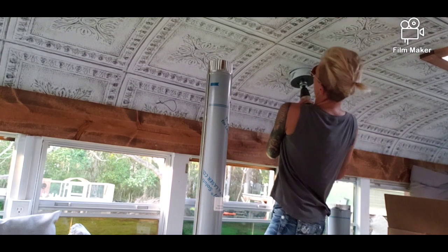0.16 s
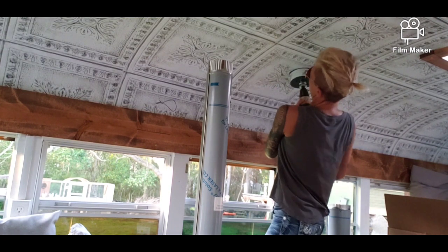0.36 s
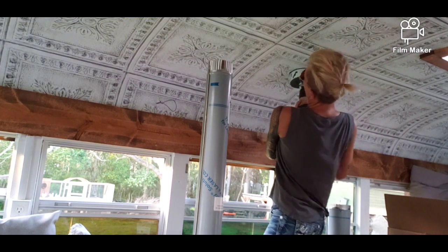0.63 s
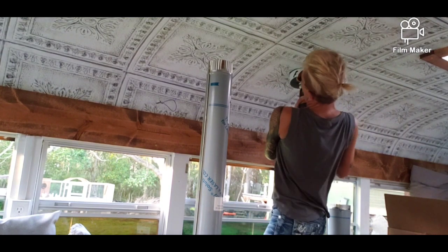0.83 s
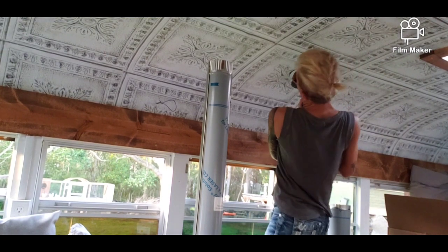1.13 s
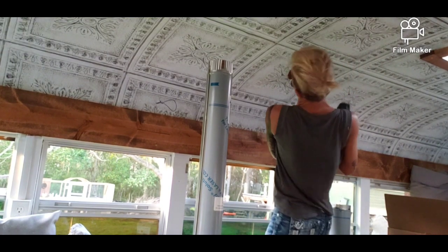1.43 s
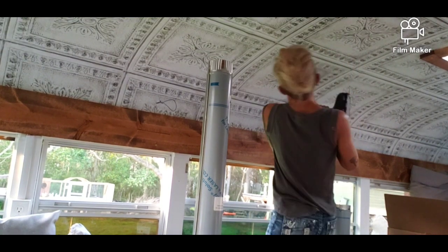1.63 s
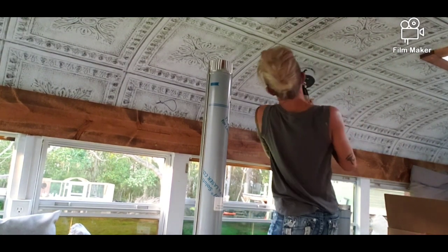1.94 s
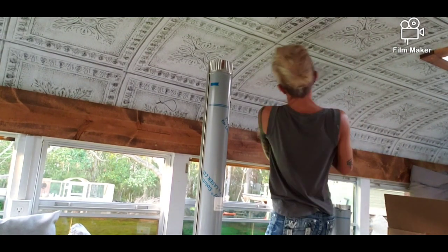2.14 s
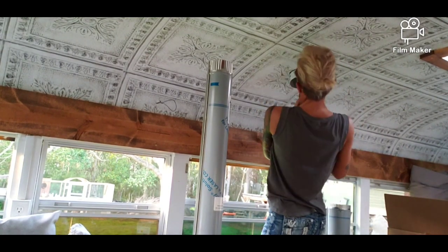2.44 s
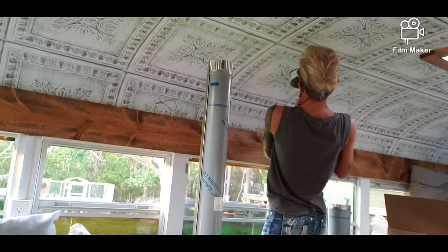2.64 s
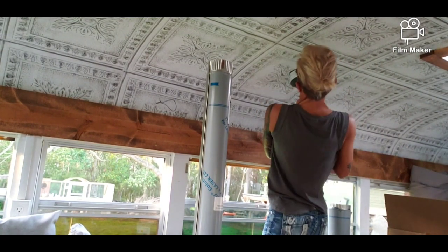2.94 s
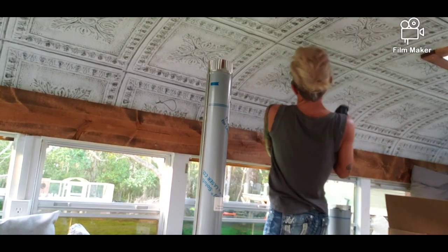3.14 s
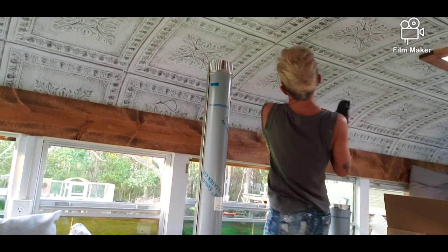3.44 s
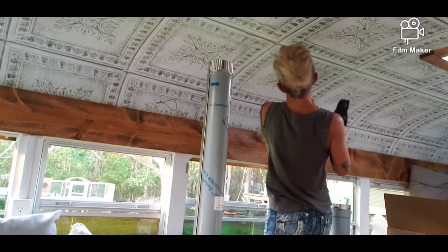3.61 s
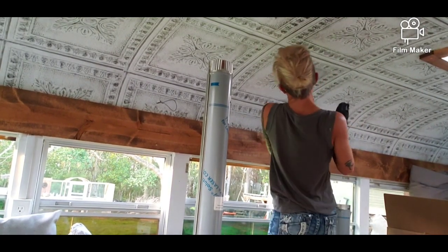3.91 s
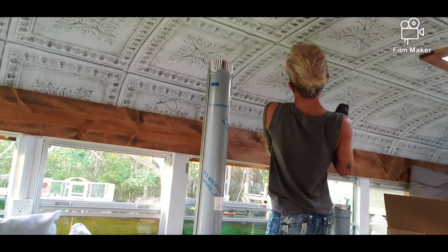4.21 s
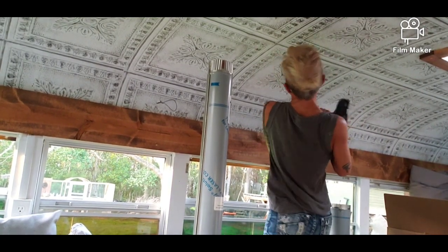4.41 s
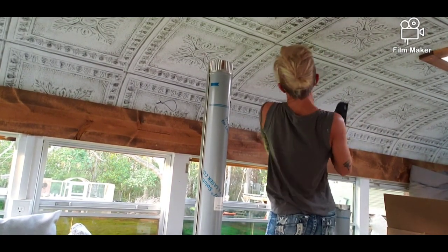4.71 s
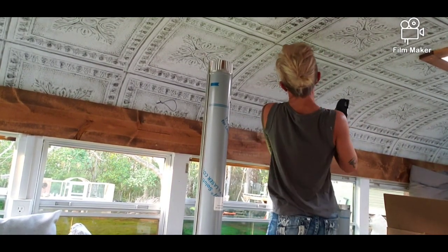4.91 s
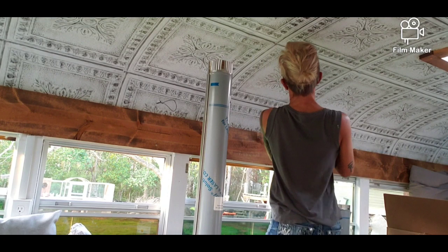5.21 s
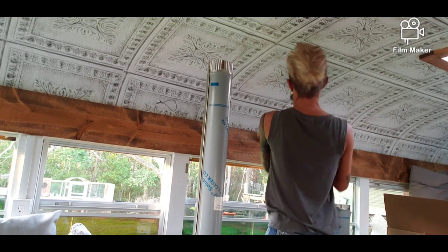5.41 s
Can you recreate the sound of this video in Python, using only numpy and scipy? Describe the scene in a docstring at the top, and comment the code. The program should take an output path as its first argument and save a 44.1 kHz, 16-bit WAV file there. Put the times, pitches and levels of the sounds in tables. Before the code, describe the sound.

Heard from nearby inside a small, hard-walled vehicle, a hole saw grinds into the metal roof in quick, uneven bursts, with hissing chips, low booming and a few thin squeaks. It eases off into a short lull with soft knocks. A second, longer run follows, juddering and snagging as the cordless drill whines underneath, then weakens with a brief falling groan from the metal.

```python
"""A hole saw bites into sheet metal with a gritty rasp, driven up through a vehicle's roof by a cordless drill.
It cuts in two runs with a pause between. Tilted, it grabs and lets go about five times a second:
the teeth tear hissing chips, the sheet rasps, the panel rattles and the roof booms.
Now and then the teeth snag and knock and the rim squeaks.
The drill whines under the cut, all inside a small, hard cabin."""
import sys
import numpy as np
from scipy import signal
from scipy.fft import rfft, irfft
from scipy.io import wavfile
from scipy.ndimage import uniform_filter1d

SR = 44100
rng = np.random.default_rng(int(sys.argv[2]) if len(sys.argv) > 2 else 0)


def wrap_up_sound(samples):
    """Save the sound to the file named by the first command line argument, as 16-bit audio."""
    columns = np.atleast_2d(samples).T
    # keep every value between -1 and 1, then stretch to whole-number steps
    tamed = np.clip(columns, -1, 1)
    steps = np.round(tamed * 32767).astype(np.int16)
    wavfile.write(sys.argv[1], SR, steps)


N = 245146
TIME, FREQS = np.arange(N) / SR, np.fft.rfftfreq(N, 1 / SR)

# Table levels are relative; each layer gets its trim in the mix.
# the tilted saw bites, holds and lets go:
# (start [s], attack [s], hold [s], chip hiss [dB], sheet rasp [dB], panel rattle [dB], roof boom [dB])
BITES = [(0.048, 0.011, .1, -32, -30, -27, -21.5), (.23, 0.062, .12, -26.5, -25, -22.5, -22),
         (0.511, 0.044, 0.15, -29.5, -25, -20, -23), (0.804, 0.017, 0.086, -28.5, -30, -27.5, -32),
         (1.037, 0.047, 0.07, -30.5, -30.5, -32, -26), (1.229, 0.054, 0.033, -31, -31, -29.5, -26.5),
         (1.358, 0.078, .04, -30.5, -28.5, -28, -22.5), (1.857, 0.043, 0.011, -57.5, -44, -41, -33),
         (2.005, 0.025, .01, -71, -57.5, -56, -58), (2.287, 0.022, 0.013, -90, -64.5, -42, -42.5),
         (2.407, 0.026, 0.024, -91, -80, -60, -46), (2.669, 0.028, 0.04, -70, -60, -49, -40.5),
         (2.767, 0.083, 0.15, -32, -32, -36, -32), (2.98, 0.031, 0.075, -36.5, -34, -34, -30),
         (3.071, 0.02, 0.098, -32.5, -28.5, -24.5, -22.5), (3.247, 0.03, .004, -34, -31.5, -26.5, -20),
         (3.391, 0.006, 0.087, -31.5, -28.5, -33, -22), (3.562, 0.043, 0.044, -32, -28, -27.5, -28),
         (3.746, 0.058, 0.054, -31, -26.5, -29, -23.5), (3.916, 0.034, 0.014, -22.5, -22.5, -15.5, -24),
         (4.007, 0.038, 0.087, -35.5, -31.5, -39, -29), (4.157, 0.093, 0.069, -32, -30.5, -36.5, -30),
         (4.34, 0.077, 0.039, -32, -29, -30.5, -25.5), (4.551, 0.01, 0.06, -33.5, -30.5, -29.5, -24.5),
         (4.738, .005, 0.06, -41, -37.5, -38.5, -37), (4.9, 0.043, 0.059, -44.5, -40, -39.5, -36),
         (5.037, 0.091, 0.029, -41, -38, -41, -40.5), (5.282, 0.038, 0.012, -55, -51.5, -48.5, -40),
         (5.452, 0.022, 0.022, -55.5, -67, -73, -59.5)]
# each part's envelope: (sag through a bite [dB/s], added fade on release [dB/s], skim offset [dB])
CHIP_ENVELOPE = (10, 247, -12)
SHEET_ENVELOPE = (7.3, 172, 0)
PANEL_ENVELOPE = (17, 122, 0)
ROOF_ENVELOPE = (8, 122, 4.5)
# the saw skims the metal between bites, dying away in the pause: (time [s], level [dB])
SKIM = [(0, -42.5), (.8, -44.5), (1.5, -47), (1.7, -58), (1.95, -56), (2.2, -70.5), (2.62, -88),
        (2.85, -46), (3.36, -49), (4.7, -57.5), (5.28, -56.5), (5.44, -75), (5.56, -76)]
# tone colour of each layer: (frequency [Hz], level [dB])
CHIP_HISS_EQ = [(2500, -43), (4000, -13.5), (5300, -12.5), (6300, -2), (7200, -7), (8400, -2.5), (10000, 2),
                (12300, 4.5), (15300, 2.5), (17000, -1)]
CUP_GRIND_EQ = [(1500, -29.5), (2400, -2), (2900, -1), (3600, -0.5), (4300, -3), (5300, -4), (7000, -13.5),
                (11000, -29.5)]
SHEET_RASP_EQ = [(280, -32), (420, -10.5), (520, -4), (800, 1.5), (1150, 0), (1500, 3), (1850, -1),
                 (2250, -10), (2600, -12.5), (3400, -26), (5000, -31.5), (9000, -47.5)]
PANEL_RATTLE_EQ = [(110, -26), (165, -5.5), (195, -0.5), (230, -2.5), (300, 1.5), (360, -3), (440, -8.5),
                   (650, -15.5), (1500, -71)]
ROOF_BOOM_EQ = [(20, -31.5), (45, -5.5), (70, -2), (92, -1.5), (125, 2), (155, -5), (190, -30.5),
                (280, -36.5), (800, -68.5)]
BUMP_CRUNCH_EQ = [(130, -22.5), (200, -0.5), (350, 2), (700, 4), (1100, 8.5), (1400, -13.5), (2200, -5),
                  (2800, -34), (6000, -49)]
ROOM_TONE_EQ = [(20, -7), (48, -1), (95, -0.5), (160, -17), (300, -29), (550, -42), (900, -38), (1300, -46),
                (1700, -50), (2000, -37), (2400, -61.5), (8000, -62.5), (14000, -66)]
# sharp resonances of sheet and saw cup: (frequency [Hz], width [Hz], gain [dB])
METAL_PEAKS = [(478.5, 9.9, 12.5), (590, 39, 3), (684.5, 45, 9), (884, 18, 7.5), (1077, 33, 2),
               (1470, 70, -1.5), (2100, 110, 10.5), (3450, 35, 5), (4280, 150, 5), (7060, 230, 5)]
# low modes of the roof: (frequency [Hz], level [dB], ring time [s])
ROOF_MODES = [(98.3, -5.5, 0.38), (99, -4.5, 0.068), (129.5, -0.5, .13), (157, -8, 0.074),
              (195.3, -5.5, 0.25), (246.5, 1, 0.063), (300, -3.5, 0.14), (360.3, -18, 0.045)]
# a tooth snags and snaps free: (time [s], level [dB], ring time [s])
SNAGS = [(.056, -45, 0.048), (.539, -13.5, 0.13), (.819, -12, 0.19), (2.067, -56, .05), (2.118, -58, 0.26),
         (2.784, -52, .12), (3.084, -21.5, .055), (3.182, -28, 0.041), (3.268, -23.5, 0.1),
         (3.39, -49, 0.047), (3.928, -22, 0.11), (3.947, -17, 0.15), (4.555, -43, 0.046),
         (4.734, -50, .057), (5.306, -46, 0.086)]
# the cup bumps or digs into the sheet: (time [s], level [dB], ring time [s])
BUMPS = [(.092, -28.5, 0.34), (.32, -26.5, .25), (.545, -21.5, 0.095), (.822, -28, 0.33),
         (1.892, -48, 0.18), (2.299, -54, 0.39), (3.084, -26, 0.37), (3.612, -32.5, .22), (3.95, -25, 0.37)]
# the saw jolts the roof: (time [s], level [dB], tilt toward the higher modes [dB/octave])
KNOCKS = [(0.086, -22.5, -5), (0.123, -18, 10), (0.19, -22, -18), (0.399, -15.5, 13), (0.558, -15.5, 5),
          (0.643, -19, -3), (0.689, -14.5, 16), (.839, -14.5, 4), (0.869, -20, 6), (1.109, -18, -4),
          (1.126, -23.5, 0), (1.499, -21.5, 1), (1.891, -34, 4), (1.94, -30.5, -3), (2.3, -36.5, -11),
          (3.095, -20, 3), (3.211, -19, -5), (3.272, -27, -6), (3.304, -16.5, -3), (3.399, -20, -3),
          (3.948, -20, 12), (3.97, -21, -4), (4.019, -20, -9), (4.565, -21, -17), (4.619, -22.5, -11),
          (4.753, -24.5, -29)]
# the rim squeaks in the kerf: (start [s], length [s], pitch [Hz], pitch wobble [Hz], level [dB])
SQUEAKS = [(0.416, 0.037, 15280, 129, -27.5), (0.902, 0.037, 14330, 350, -27),
           (1.121, 0.02, 15100, 132, -19.5), (2.93, 0.039, 14600, 350, -31),
           (5.258, 0.012, 12680, 330, -42)]
# the whine climbs into the second run, then sags under load: (time [s], pitch [Hz], level [dB])
RUN_UP = [(2.8, 2700, -38), (2.843, 3610, -38), (2.878, 3470, -29), (2.893, 3520, -43), (2.907, 4080, -38),
          (2.98, 4200, -40), (3.015, 3446, -36), (3.045, 3040, -39), (3.08, 3390, -43), (3.18, 2950, -42)]
# brief whines poke through: (start [s], length [s], first pitch [Hz], last pitch [Hz], level [dB])
WHINES = [(2.713, .07, 6420, 6070, -60), (3.26, .08, 6200, 6340, -53), (4.071, 0.03, 3290, 3380, -40),
          (4.239, 0.15, 3500, 3480, -39.5), (4.397, 0.11, 3580, 3080, -40), (4.843, .09, 5800, 5630, -63),
          (4.992, 0.12, 6040, 6300, -57), (5.344, .21, 4630, 4460, -78)]
# the sheet groans as the saw drags: (time [s], pitch [Hz], level [dB])
GROAN = [(4.84, 370, -50), (4.875, 342, -38.5), (4.915, 321, -47.5), (4.945, 270, -44), (4.98, 239, -46)]
# how alike left and right are: (frequency [Hz], likeness [0-1])
STEREO_LIKENESS = [(100, .99), (180, .96), (330, .87), (550, .62), (800, .3), (1300, .18), (3000, .15),
                   (12000, .12)]
# stereo balance: (frequency [Hz], left over right [dB])
STEREO_BALANCE = [(100, .4), (300, -.7), (600, -3.5), (1400, -2.2), (2800, -2.7), (5600, -4.3), (9500, -.6),
                  (14000, -3.8)]


def cutting():
    """Tearing teeth excite chips, saw cup and sheet; the saw's judder shakes panel and roof."""
    envelopes = CHIP_ENVELOPE, SHEET_ENVELOPE, PANEL_ENVELOPE, ROOF_ENVELOPE
    hiss_db, rasp_db, rattle_db, boom_db = (bite_db(k, *shape) for k, shape in enumerate(envelopes))
    grind_db = hiss_db + 0.69 * (rasp_db - hiss_db)  # the cup follows the sheet more than the chips
    judder = wander(49)
    tears = tearing_teeth(per_s=700, spread_db=3.5, judder_gain=amp(1.6 * judder))
    flutter = amp(0.3 * wander(60))
    chips, cup, sheet = (leveller(stereo(tears, curve(eq) + metal_db()), 0.017)
                         for eq in (CHIP_HISS_EQ, CUP_GRIND_EQ, SHEET_RASP_EQ))
    ringing = sheet_pings(per_s=260, low_hz=487.8, high_hz=2403, t60=0.12)
    shake = rng.standard_normal((2, N)) * amp(2 * judder)
    modes_db = 5 * sum(1 / (1 + ((FREQS - hz) * t60) ** 2) for hz, _, t60 in ROOF_MODES)
    panel = leveller(stereo(shake, curve(PANEL_RATTLE_EQ) + modes_db), 0.025)
    roof = leveller(stereo(shake, curve(ROOF_BOOM_EQ) + modes_db), 0.026)
    sizzle = amp(hiss_db - 1.74) * chips + amp(grind_db - 5) * cup
    rasp = amp(rasp_db - 1.15) * sheet + amp(rasp_db - 7) * ringing
    body = amp(rattle_db - 1.13) * panel + amp(boom_db - 2.03) * roof
    return flutter * (sizzle + rasp) + body


def bite_db(part, sag_db_per_s, fade_db_per_s, skim_db):
    """Envelope of one part of the cut: each bite rises, holds and fades over the light skimming."""
    power = amp(np.interp(TIME, *np.transpose(SKIM)) + skim_db) ** 2
    t = TIME[:SR]
    for start, attack, hold, *levels in BITES:
        rise = np.minimum(t / attack, 1)
        fall_db = sag_db_per_s * t + fade_db_per_s * np.maximum(t - attack - hold, 0)
        add(power, start, (rise * amp(levels[part] - fall_db)) ** 2)
    return 10 * np.log10(power)


def tearing_teeth(per_s, spread_db, judder_gain, places=8):
    """Tiny tears, a few much larger, from places round the rim, each on its own path through the cabin."""
    out = np.zeros((2, N))
    for _ in range(places):
        size = amp(spread_db * np.minimum(rng.exponential(1, N), 4))
        grit = unit(rng.standard_normal(N) * size * (rng.random(N) < per_s / SR))
        out += cabin(grit * judder_gain, t60=0.11, wet_db=9.5)
    return out


def sheet_pings(per_s, low_hz, high_hz, t60, count=120):
    """Teeth pluck the sheet's many modes at random: short rings scattered between left and right."""
    out, t = np.zeros((2, N)), TIME[:SR // 8]
    mode_hz = np.exp(rng.uniform(np.log(low_hz), np.log(high_hz), count))
    envelope = amp(-60 * t / t60) * (1 - np.exp(-t / 0.002))
    for when, which, side, size in rng.random((int(per_s * N / SR), 4)):
        ring = np.sin(2 * np.pi * mode_hz[int(which * count)] * t) * envelope
        pan = [[np.cos(np.pi * side)], [np.sin(np.pi * side)]]
        add(out, when * N / SR, size * ring * pan)
    return unit(out)


def snags_and_bumps():
    """Bright snags ring chips, cup and sheet together; bumps give a dull crunch from the sheet alone."""
    bright = amp(curve(CHIP_HISS_EQ)) + amp(curve(CUP_GRIND_EQ) + 7) + amp(curve(SHEET_RASP_EQ) + 3.5)
    snags = metal_hits(SNAGS, 20 * np.log10(bright))
    bumps = metal_hits(BUMPS, curve(BUMP_CRUNCH_EQ))
    return amp(-2.5) * snags + amp(3) * bumps


def metal_hits(hits, eq_db):
    """A blow sets many close modes going at once: a fast-dying burst of metallic noise."""
    bursts, t = np.zeros((2, N)), TIME[:SR // 3]
    for start, db, t60 in hits:
        add(bursts, start, rng.standard_normal((2, len(t))) * amp(db - 60 * t / t60))
    colour = unit(amp(eq_db + metal_db()))
    return stereo(bursts, 20 * np.log10(colour))


def roof_knocks():
    """Jolts ring the low modes of the roof, each a little differently as the saw moves."""
    out, t = np.zeros(N), TIME[:SR // 4]
    hz, mode_db, t60 = np.transpose(ROOF_MODES)[:, :, None]
    attack = 1 - np.exp(-t / 0.00057)
    for start, db, tilt in KNOCKS:
        weight = amp(mode_db + tilt * np.log2(hz / hz.mean()))
        detune = 1 + 0.025 * rng.standard_normal(hz.shape)
        phase = 2 * np.pi * (hz * detune * t + rng.random(hz.shape))
        rings = weight / np.linalg.norm(weight) * amp(-60 * t / t60) * np.sin(phase)
        add(out, start, amp(db) * rings.sum(0) * attack)
    # a sheet radiates little below its lowest mode
    low_cut = signal.butter(2, 55, "high", fs=SR, output="sos")
    return amp(4.5) * signal.sosfilt(low_cut, out)


def rim_squeaks():
    """The rim sticks and slips: a short, unsteady whistle that hangs in the cabin."""
    out = np.zeros(N)
    for start, length, hz, wobble_hz, db in SQUEAKS:
        swell = np.sin(np.pi * np.clip((TIME - start) / length, 0, 1)) ** 2
        on = swell > 1e-9
        drift = unit(uniform_filter1d(rng.standard_normal(SR // 4), 40))[:on.sum()]
        phase = 2 * np.pi * np.cumsum(hz + wobble_hz * drift) / SR
        out[on] += amp(db) * np.sqrt(2 * swell[on]) * np.sin(phase)
    return cabin(out, t60=0.13, wet_db=4.5)


def drill_whine(edge_db=-7, ragged_db=3.8):
    """The drill's ragged whine: one run-up, and brief glides that swell and fade."""
    whine = tone(RUN_UP, waver=0.033, octave_db=-14)
    for start, length, first_hz, last_hz, db in WHINES:
        glide = [(start, first_hz, db + edge_db),
                 (start + length / 2, (first_hz + last_hz) / 2, db),
                 (start + length, last_hz, db + edge_db)]
        whine += tone(glide, waver=0.024, octave_db=-10)
    roughness = amp(ragged_db * wander(300))
    return amp(-0.5) * cabin(whine * roughness, t60=0.066, wet_db=10)


def sheet_groan():
    """The dragging saw draws a low, falling groan from the sheet."""
    return tone(GROAN, waver=0.023, octave_db=-16)


def room_tone():
    """The quiet cabin: a faint bed of low rumble."""
    return amp(-53) * unit(stereo(rng.standard_normal((2, N)), curve(ROOM_TONE_EQ)))


def cabin(x, t60, wet_db):
    """Direct sound plus dense reflections off hard walls, different left and right."""
    t = TIME[:SR // 2]
    tail = rng.standard_normal((2, len(t))) * amp(-60 * t / t60)
    response = amp(wet_db) * tail / np.linalg.norm(tail, axis=1, keepdims=True)
    response[:, 0] += 1
    response /= np.linalg.norm(response, axis=1, keepdims=True)
    return signal.fftconvolve(np.atleast_2d(x), response, axes=1)[:, :N]


def metal_db():
    """The resonances of sheet and saw cup as an EQ curve."""
    return sum(db / (1 + (2 * (FREQS - hz) / width) ** 2) for hz, width, db in METAL_PEAKS)


def tone(points, waver, octave_db):
    """A wavering sine and its octave, riding a pitch and level curve."""
    times, hz, db = np.transpose(points)
    span = slice(int(times[0] * SR), min(int(times[-1] * SR), N))
    t, out = TIME[span], np.zeros(N)
    pitch = np.interp(t, times, hz) * (1 + waver * wander(186)[span])
    phase = 2 * np.pi * np.cumsum(pitch) / SR
    wave = unit(np.sin(phase) + amp(octave_db) * np.sin(2 * phase))
    out[span] = wave * amp(np.interp(t, times, db)) * signal.windows.tukey(len(t), 0.1)
    return out


def stereo(x, eq_db):
    """EQs two signals and blends them as mid and side: bass centred, treble wide."""
    mid, side = rfft(x)
    angle = np.arccos(np.clip(curve(STEREO_LIKENESS), 0, 1)) / 2
    mid, side = mid * np.cos(angle), side * np.sin(angle)
    lean = amp(curve(STEREO_BALANCE) / 2)
    lead_s = 0.00041 * np.clip(FREQS / 900 - 0.4, 0, 1)  # the treble arrives on the left first
    left = (mid + side) * lean * np.exp(2j * np.pi * FREQS * lead_s)
    right = (mid - side) / lean
    return irfft(np.array([left, right]) * amp(eq_db), N)


def leveller(x, seconds):
    """Evens out slow swings in level and keeps the fast grain."""
    width = int(seconds * SR)
    power = uniform_filter1d(uniform_filter1d(np.mean(x ** 2, axis=0), width), width)
    return x / np.sqrt(abs(power) + 1e-20)


def wander(hz):
    """Smooth random modulation up to about the given rate."""
    return unit(irfft(rfft(rng.standard_normal(N)) * np.exp(-(FREQS / hz) ** 2), N))


def curve(points):
    """Joins breakpoints along a log frequency axis."""
    hz, value = np.transpose(points)
    return np.interp(np.log(FREQS + 1), np.log(hz + 1), value)


def add(mix, start, sound):
    """Lays a sound into the mix at a time in seconds."""
    part = mix[..., round(start * SR):][..., :sound.shape[-1]]
    part += sound[..., :part.shape[-1]]


def amp(db):
    """Decibels to gain."""
    return 10 ** (np.asarray(db) / 20)


def unit(x):
    """Scales to an rms of one."""
    return x / np.sqrt(np.mean(x ** 2) + 1e-20)


def scene():
    """The cut up front, with its hits and squeaks, over the drill and the cabin's rumble."""
    bed = room_tone()
    saw = cutting() + snags_and_bumps() + roof_knocks() + rim_squeaks()
    return saw + drill_whine() + sheet_groan() + bed


def record(dry):
    """A steep high cut at 15.9 kHz on the whole mix."""
    high_cut = signal.firwin(401, 15900, window=("kaiser", 8), fs=SR)
    return signal.oaconvolve(dry, high_cut[None], "same")


dry = scene()
out = record(dry)
wrap_up_sound(out)
```